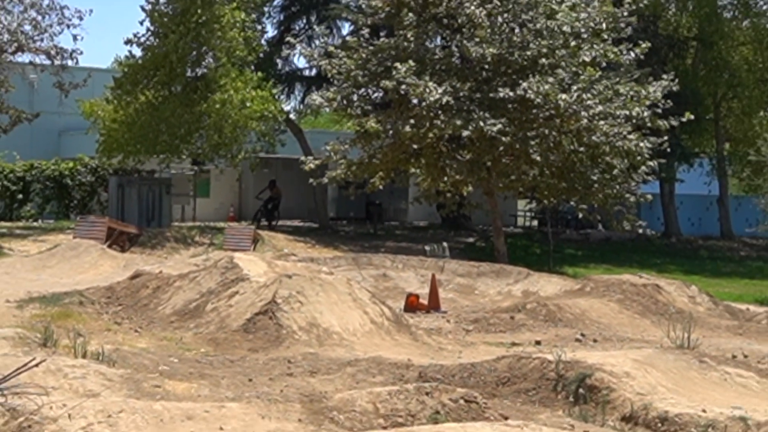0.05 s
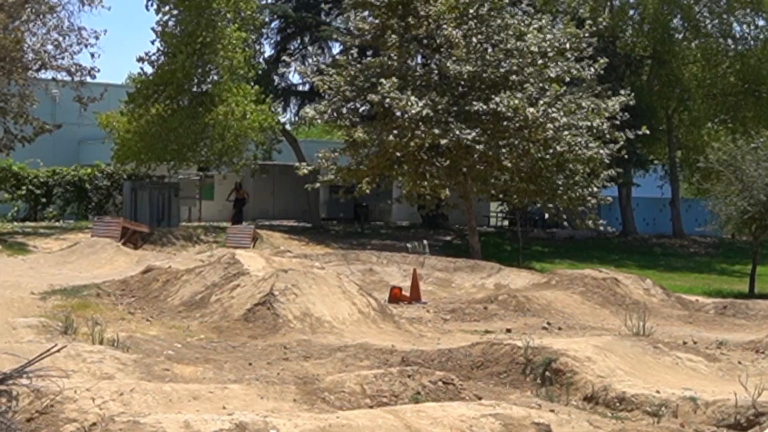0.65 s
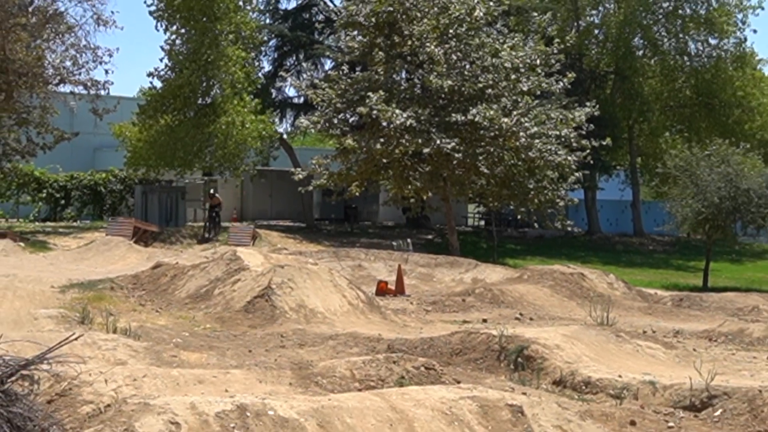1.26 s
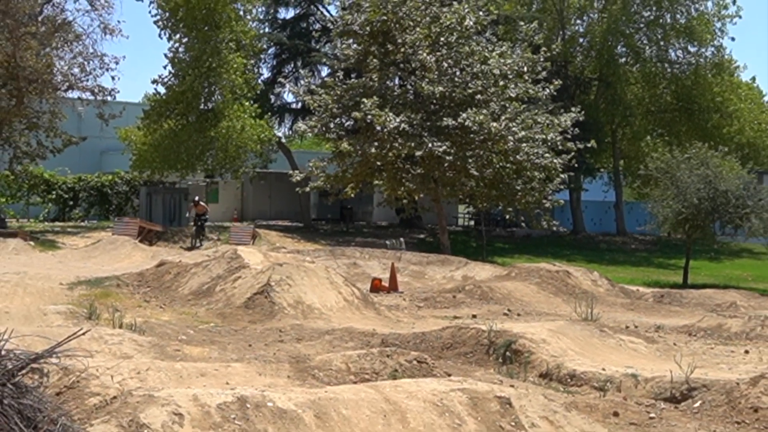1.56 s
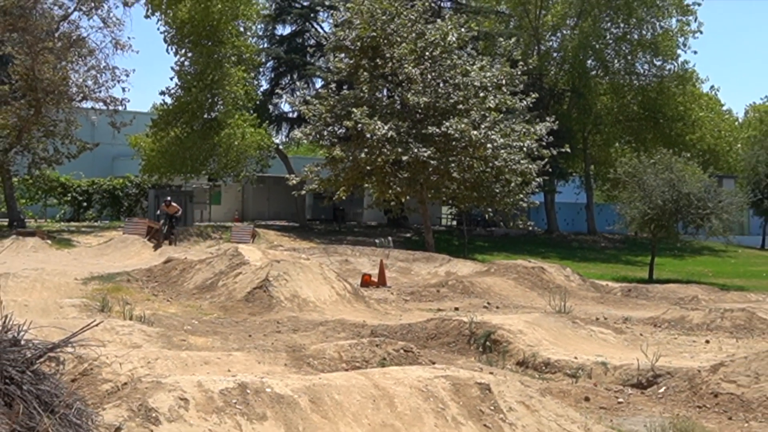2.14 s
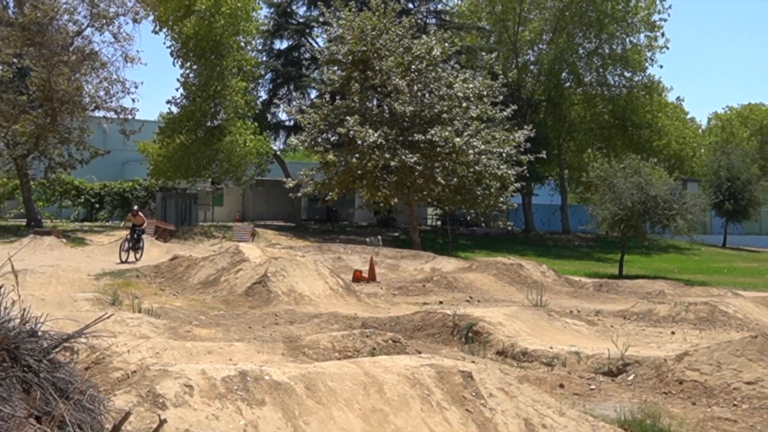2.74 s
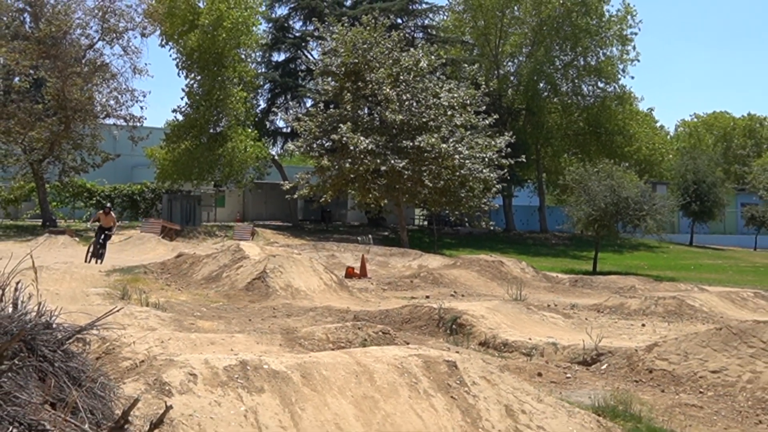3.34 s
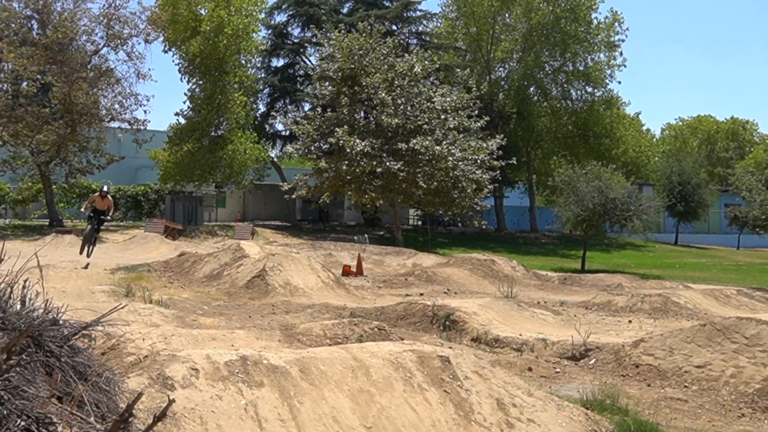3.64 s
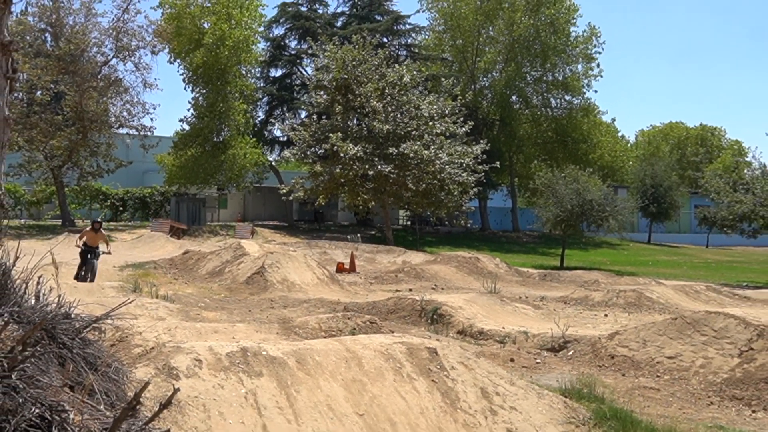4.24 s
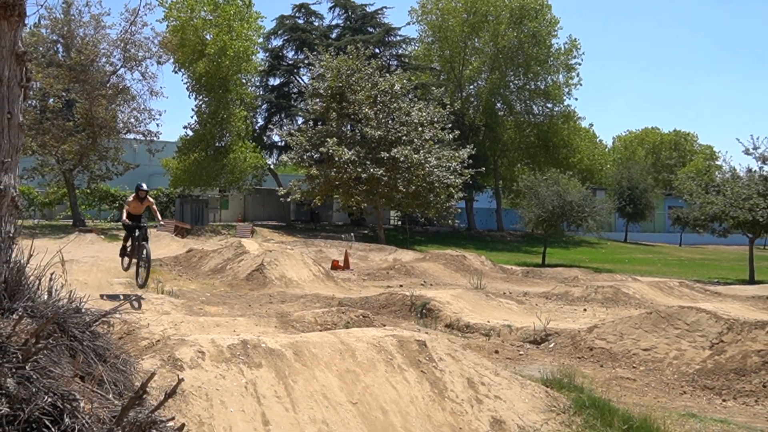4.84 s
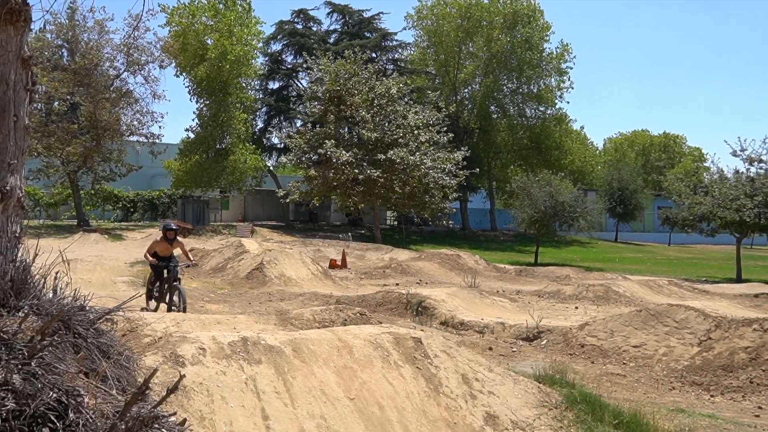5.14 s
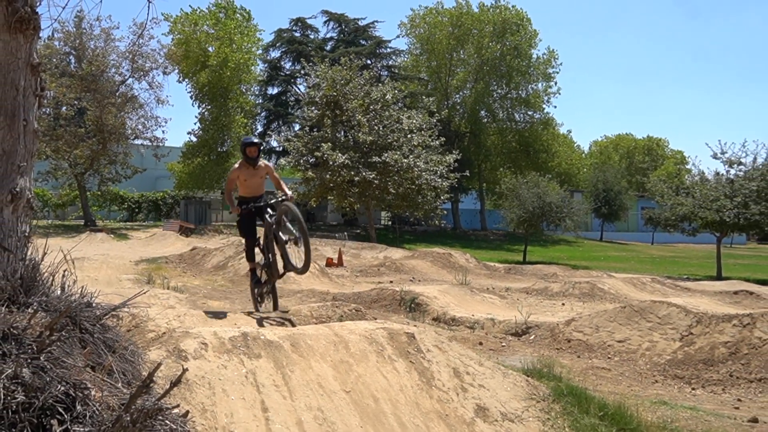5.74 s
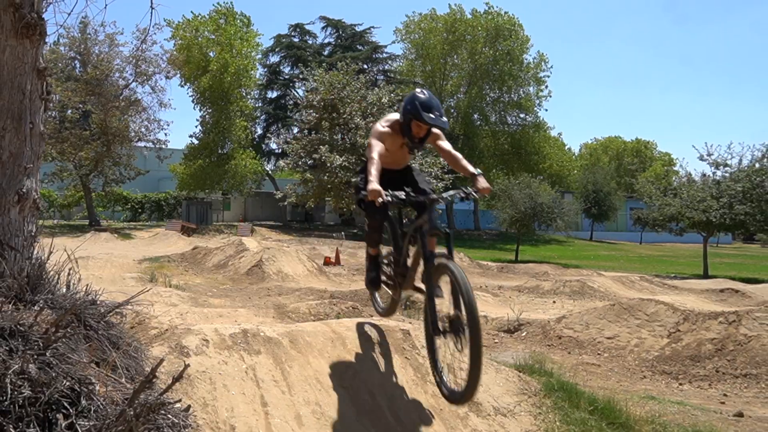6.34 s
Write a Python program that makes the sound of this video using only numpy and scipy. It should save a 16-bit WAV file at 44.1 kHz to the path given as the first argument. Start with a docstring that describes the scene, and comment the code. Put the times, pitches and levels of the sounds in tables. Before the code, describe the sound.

Outdoors at a dirt jump track, low wind buffeting dominates, with soft far traffic and trees behind it. In the second half a bike emerges from the distance with gritty tyre noise, small ticks and a thin freewheel buzz. It thuds over a bump, crunches up a ramp and whirrs through the air, ending with a knock and chain slap near the microphone.

```python
"""Mountain bike jump in gusty wind.

Eddies buffet the microphone's two ports over a wash of distant traffic and trees.
A bike rolls closer: tyres crush dry dirt and pop stones; frame and chain rattle on
bumps and landings. It takes off and flies towards the microphone, its freewheel
buzzing as the pawls snap over the ratchet and ring the hub."""
import sys
import numpy as np
from scipy import signal
from scipy.fft import rfft, irfft, next_fast_len
from scipy.io import wavfile
from scipy.ndimage import uniform_filter1d, map_coordinates

SR = 44100
rng = np.random.default_rng(int(sys.argv[2]) if len(sys.argv) > 2 else 0)


def generate_wav(signal):
    """Clip the signal to [-1, 1] and save it as 16-bit WAV at the path in sys.argv[1]."""
    frames = np.transpose(np.atleast_2d(signal))
    scaled = np.clip(frames, -1, 1) * 32767
    pcm = np.round(scaled).astype(np.int16)
    wavfile.write(sys.argv[1], SR, pcm)


N = 286209
TIME = np.arange(N) / SR


def from_db(db):
    """Decibels to gain."""
    return 10 ** (np.asarray(db) / 20)


def rms_one(x):
    """Scale to unit rms."""
    return x / np.sqrt(np.mean(x ** 2) + 1e-20)


def curve(rows):
    """Breakpoints (t/s, value) interpolated at every sample."""
    return np.interp(TIME, *np.transpose(rows))


def colour(x, spectrum):
    """Filter by breakpoints (f/Hz, level/dB); unit rms."""
    size = next_fast_len(N + 4096)
    hz, db = np.transpose(spectrum)
    bins_hz = np.maximum(np.arange(size // 2 + 1) * SR / size, 1)
    gain = from_db(np.interp(np.log(bins_hz), np.log(hz), db))
    return rms_one(irfft(rfft(x, size) * gain, size)[..., :N])


def drift(rate_hz):
    """Smooth random wander; unit rms."""
    knots, coarse_s = rng.standard_normal(4000), TIME[::16]
    wander = map_coordinates(knots, [coarse_s * rate_hz], order=2, mode="wrap")
    return rms_one(np.interp(TIME, coarse_s, wander))


def stereo_noise(side_db):
    """White noise, partly different in the two channels."""
    mid, side = rng.standard_normal((2, N))
    return mid + from_db(side_db) * side * [[1], [-1]]


def diffuse_noise():
    """Antiphase white noise: sound from all around."""
    return rng.standard_normal(N) * [[1], [-1]]


def delay(x, ms):
    """Variable fractional delay."""
    return map_coordinates(x, [np.arange(N) - ms * SR / 1000], order=3, mode="nearest")


def lag_right(x, ms):
    """The right channel trails the left."""
    return np.array([x[0], delay(x[1], ms)])


def resonate(x, modes):
    """Parallel resonances (f/Hz, width/Hz, rms level/dB)."""
    out = 0
    for hz, width_hz, db in modes:
        radius = np.exp(-np.pi * width_hz / SR)
        feedback = [1, -2 * radius * np.cos(2 * np.pi * hz / SR), radius ** 2]
        out = out + from_db(db) * rms_one(signal.lfilter([1, 0, -1], feedback, x))
    return out


def held(start_s, length_s, rise_s, fall_s):
    """Envelope: rise up to start_s, hold, fall; rise and fall times per 20 dB."""
    before = np.maximum(start_s - TIME, 0) / rise_s
    after = np.maximum(TIME - start_s - length_s, 0) / fall_s
    return from_db(-20 * np.minimum(before + after, 10))


def blows(hits, t60_s, trim_db, late_s=0):
    """Envelope of hits (t/s, level/dB): sudden rise, exponential fall."""
    envelope = 0
    for s, db in hits:
        age_s = TIME - (s + late_s)
        envelope = envelope + (age_s >= 0) * from_db(db + trim_db - 60 * np.clip(age_s / t60_s, 0, 3))
    return envelope


# Breeze between gusts: t/s, level/dB
BREEZE_LEVEL = [(0, -31.5), (0.85, -29.5), (1.6, -29.5), (2.3, -32.5), (2.95, -35), (3.25, -37.5),
                (3.7, -37.5), (4.35, -55), (4.6, -36.5), (5.22, -36.5), (5.38, -31.5), (5.7, -34.5),
                (6.05, -38), (6.49, -35)]
# Gusts: t/s, length/s, level/dB, large-eddy share/dB, small-eddy share/dB
WIND_GUSTS = [(0.021, 0.076, -23, 2.5, -12), (0.122, 0.11, -25.5, -9, -29), (0.616, 0.02, -29, -5, -16.5),
              (0.817, 0.026, -27, -3, -20), (0.892, 0.2, -27, -1, -15), (1.088, 0.033, -19, -1, -6),
              (1.267, 0.16, -26, -.5, -9.5), (1.545, 0.2, -22.5, -3, -9.5), (1.726, .11, -20, -5, -5.5),
              (1.861, 0.33, -22, -4.5, -8.5), (2.251, 0.14, -19.5, -9, -7), (2.48, 0.13, -24.5, -4, -6.5),
              (2.59, 0.029, -20.5, -1.5, -5.5), (2.701, 0.058, -26.5, -19, -16),
              (2.832, 0.054, -30.5, -4, -14), (2.987, 0.023, -27.5, 0.5, -11),
              (3.392, 0.053, -36.5, -11, -4.5), (3.569, 0.085, -27, 0.5, -12.5),
              (3.715, 0.12, -27.5, -1, -15), (3.912, 0.058, -27, 2.5, -20), (3.981, 0.1, -19, -7, -15),
              (4.122, 0.039, -25, 1, -19), (4.254, 0.086, -24, -1, -14), (4.427, 0.053, -23, -5.5, -15),
              (5.337, .27, -28, 0.5, -10), (5.368, 0.042, -25, 1.5, -4.5), (6.196, 0.095, -30, -1.5, -23),
              (6.421, 0.039, -28, -2.5, -15)]


def eddy_gains():
    """Swell, rumble, buffet and flutter gains: breeze carries large eddies, gusts stir all sizes."""
    breeze = from_db(curve(BREEZE_LEVEL))
    large = middle = small = 0
    for s, length_s, db, large_db, small_db in WIND_GUSTS:
        gust = from_db(db) * held(s, length_s, rise_s=0.046, fall_s=0.072)
        slow_gust = from_db(db) * held(s, length_s, rise_s=0.065, fall_s=0.091)
        large = np.maximum(large, slow_gust * from_db(large_db))
        middle = np.maximum(middle, gust)
        small = np.maximum(small, gust * from_db(small_db))
    return (np.hypot(breeze * from_db(-3.5), large * from_db(-7)),
            np.hypot(breeze, large),
            np.hypot(breeze * from_db(-8.5), middle * from_db(-0.1)),
            np.hypot(breeze * from_db(-20.5), small))


def turbulence(source, spectrum, span_s, lumpy_db, lumps_hz):
    """Pressure of eddies of one size: levelled over span_s, then made lumpy."""
    flow = colour(source, spectrum)
    power = uniform_filter1d(np.mean(flow ** 2, axis=0), int(span_s * SR) + 1)
    lumps = from_db(lumpy_db * drift(lumps_hz))
    return colour(flow / np.sqrt(power + 1e-6) * lumps, [(1500, -2.5), (5000, -72)])


# Eddy spectra, largest eddies first: f/Hz, level/dB
SWELL_SPECTRUM = [(2, -40), (15, -4.5), (30, -3.5), (48, -0.5), (62, -11), (120, -49), (1000, -130)]
RUMBLE_SPECTRUM = [(10, -48), (45, -22.5), (60, 1), (80, 3.5), (105, -3), (150, -12), (400, -60),
                   (2000, -130)]
BUFFET_SPECTRUM = [(30, -61), (100, -3.5), (130, 3), (190, -2.5), (250, -7.5), (340, -21.5), (800, -76.5),
                   (3000, -130)]
FLUTTER_SPECTRUM = [(80, -49), (240, -5), (290, 0.5), (400, -6.5), (550, -18.5), (800, -24.5), (1500, -62),
                    (8000, -120)]


def wind():
    """Eddies sweep the left port, then the right; the strongest pushes are rounded off."""
    swell_gain, rumble_gain, buffet_gain, flutter_gain = eddy_gains()
    swell = turbulence(stereo_noise(-15), SWELL_SPECTRUM, span_s=0.37, lumpy_db=0, lumps_hz=3.1)
    rumble = turbulence(stereo_noise(-13), RUMBLE_SPECTRUM, span_s=0.064, lumpy_db=2.5, lumps_hz=30)
    buffet = turbulence(stereo_noise(-8.5), BUFFET_SPECTRUM, span_s=0.05, lumpy_db=2.5, lumps_hz=60)
    # Buffet crests steepen and break into small eddies.
    crests = colour(buffet ** 3, [(150, -23), (300, -2), (600, 7.5), (1500, 20)])
    breakup = 1.16 * colour(stereo_noise(-8.5), [(1200, -5.5), (4000, -58)]) * np.abs(buffet)
    flutter = turbulence(crests + breakup, FLUTTER_SPECTRUM, span_s=0.037, lumpy_db=2, lumps_hz=80)
    calm = wakes()
    slant = 1 + 0.2 * drift(8)  # wind direction wanders
    pressure = (lag_right(swell_gain * swell + rumble_gain * rumble, ms=0.15 * slant)
                + lag_right(calm * buffet_gain * buffet, ms=0.8 * slant)
                + lag_right(calm * flutter_gain * flutter, ms=0.62 * slant)
                + vortices())
    return 0.89 * np.tanh(pressure / 0.74)


def swirl(age_s, hz, lag_ms, phase_cycles, half_length_cycles=0.44, quickening=0.15):
    """A few quickening swings of push and suction, at each port in turn."""
    cycles = (age_s + np.array([[0.5], [-0.5]]) * lag_ms / 1000) * hz
    envelope = np.exp(-(cycles / half_length_cycles) ** 2 / 2)
    return envelope * np.sin(2 * np.pi * (phase_cycles + cycles + quickening * cycles ** 2 / 2))


# Single strong eddies: t/s, relative level/dB, f/Hz, right-port lag/ms
VORTICES = [(0.041, -10, 202, 1.1), (0.047, -14.5, 222, 0.5), (0.081, -17, 163, 1),
            (0.157, -18.5, 185, 1.1), (0.914, -5, 210, 2.25), (1.074, -9.5, 164, 1), (1.1, -7, 222, 1.5),
            (1.117, -7, 244, 1.8), (1.13, -11, 200, -1.5), (1.177, -12.5, 170, 1.1), (1.221, -4, 193, 1.6),
            (1.274, -6.5, 195, 1.5), (1.293, -11, 165, 1.2), (1.323, -10.5, 256, 2.25),
            (1.357, -9.5, 175, 1), (1.393, -8.5, 195, 1.9), (1.559, -13.5, 180, 1.1), (1.62, -5, 210, 1.9),
            (1.688, -8, 175, 1.3), (1.706, -9.5, 168, 1), (1.729, -12, 220, 1.4), (1.773, -12, 230, 0.6),
            (1.798, -6, 200, 1.5), (1.808, -11, 190, 0.7), (1.838, -14, 245, 0.5), (1.963, -7, 222, 1.65),
            (2.005, -13, 242, 1), (2.028, -10, 235, 2.2), (2.043, -9.5, 162, 0.5), (2.055, -11.5, 196, 1.3),
            (2.096, -10, 248, 2.5), (2.115, -12, 253, 0.7), (2.18, -15.5, 256, 0.7), (2.262, -9, 218, 0.7),
            (2.295, -8.5, 218, 0.9), (2.313, -11.5, 173, 0.3), (2.368, -14, 233, 1),
            (2.397, -11.5, 237, 0.4), (2.416, -10, 210, 2), (2.491, -16, 288, -0.3), (2.503, -13, 218, 2),
            (2.587, -13, 230, 2), (2.611, -12, 150, 0.5), (2.631, -9.5, 256, 1.7), (2.644, -8.5, 187, 0.95),
            (2.697, -12, 177, 0.8), (2.826, -14.5, 174, 1.1), (2.846, -17, 247, 1.3),
            (2.878, -13, 235, 0.8), (2.981, -7.5, 205, 1.2), (3.528, -8, 200, 1.6), (3.619, -13, 194, 1.05),
            (3.827, -18, 183, 2), (3.912, -15, 193, 4), (4.017, -10, 189, 1.5), (4.079, -12.5, 197, 3.5),
            (4.24, -13, 197, 1), (4.333, -10, 196, 1), (4.423, -13.5, 164, 1.3), (4.461, -12, 213, 0.64),
            (5.379, -6, 218, 4), (5.392, -5.5, 362, 0.3), (5.412, -7, 149, 1.7), (5.432, -5, 192, 1.2),
            (5.441, -10.5, 290, 0.6), (5.493, -8.5, 224, 2.8), (5.569, -11, 160, 1.5),
            (6.409, -13.5, 112, 1.1)]


def vortices(trim_db=-1.26):
    """Each passing vortex is a swirl with a sharper core that crosses the ports sooner."""
    pressure = np.zeros((2, N))
    for (s, db, hz, lag_ms), phase_cycles in zip(VORTICES, rng.random(len(VORTICES))):
        near = np.abs(TIME - s) < 0.03
        age_s = TIME[near] - s
        body = swirl(age_s, hz, lag_ms, phase_cycles)
        core = swirl(age_s, 2 * hz, 0.55 * lag_ms, 2 * phase_cycles)
        pressure[:, near] += from_db(db + trim_db) * (body + 0.31 * core)
    return signal.sosfilt(signal.butter(6, 760, fs=SR, output="sos"), pressure + 1e-18)


def wakes(late_s=0.00088, half_length_s=0.012, depth=0.46):
    """Gain of the lesser eddies, which each vortex sweeps aside."""
    centres_s = np.sort([s + late_s for s, *_ in VORTICES])
    nearest = np.searchsorted((centres_s[1:] + centres_s[:-1]) / 2, TIME)
    gap_s = np.abs(TIME - centres_s[nearest])
    return 1 - depth * np.exp(-np.minimum(gap_s / half_length_s, 10) ** 2)


# Distant wash: t/s, relative level/dB
WASH_CURVE = [(0, -51.5), (1.08, -50.5), (1.14, -53), (2.4, -56.5), (3.3, -55.5), (4.2, -54.5), (4.6, -55)]
# Spectra of the wash and of its diffuse part: f/Hz, level/dB
WASH_SPECTRUM = [(100, 5.5), (250, -5.5), (500, 4.5), (750, 1), (1050, 0.5), (1400, -2.5), (2000, -5),
                 (3000, -11), (4500, -15.5), (7000, -24), (10000, -29), (16000, -36)]
WASH_SIDE_SPECTRUM = [(900, -6), (2500, 0), (6000, 2)]
# Far whines: f/Hz, width/Hz, level/dB re wash, fade start t/s
FAR_WHINES = [(1127, 18, -13, 7), (4080, 9.1, -23.5, 0.97)]


def wash():
    """Far traffic and leaves, wider in the treble, with two thin whines."""
    spread = rng.standard_normal(N) + from_db(-1.5) * colour(diffuse_noise(), WASH_SIDE_SPECTRUM)
    whines = sum(held(0, until_s, rise_s=1, fall_s=1) * resonate(stereo_noise(side_db=1), [mode])
                 for *mode, until_s in FAR_WHINES)
    gain = from_db(curve(WASH_CURVE) + 9 + 0.68 * drift(24.77))
    return gain * (colour(spread, WASH_SPECTRUM) + whines)


# Traffic swell: f/Hz, level/dB
RUSH_SPECTRUM = [(400, -22), (800, -0.5), (1150, 0), (1500, -10), (2500, -17), (8000, -43)]


def traffic_rush(level_db=-53):
    """A soft rush in the distant traffic swells and passes."""
    envelope = held(start_s=0.78, length_s=0.44, rise_s=1.3, fall_s=0.9)
    return from_db(level_db) * envelope * colour(stereo_noise(side_db=-4), RUSH_SPECTRUM)


# Chain and grit ticks: t/s, relative level/dB
TICK_HITS = [(0.9556, -34.5), (2.1858, -40.5), (3.3403, -41.5), (4.0542, -39), (4.072, -39), (4.091, -37.5),
             (4.1076, -37), (4.228, -38), (4.4767, -42), (5.063, -32), (5.315, -31), (5.458, -25),
             (5.556, -29), (5.628, -32)]


def ticks():
    """Chain and grit give short bright snaps."""
    hiss = colour(stereo_noise(side_db=-1.5), [(1000, -12), (3200, 0.5), (8000, -4.5), (16000, -17)])
    return blows(TICK_HITS, t60_s=0.024, trim_db=-5, late_s=0.0011) * hiss


# Level dips: t/s, depth/dB
GUST_DIPS = [(1.124, 10.5), (1.23, 6.5), (1.64, 4), (1.82, 4), (2.321, 8.5), (2.42, 3.5), (4.34, 4),
             (5.41, 5)]


def dips(onset_s=0.021, recovery_s=0.071):
    """Gain of wash and bike: drops quickly at the hardest gusts and creeps back."""
    loss_db = 0
    for s, db in GUST_DIPS:
        onset = np.clip((TIME - s) / onset_s + 1, 0, 1)
        loss_db = loss_db + db * onset * np.exp(-np.maximum(TIME - s, 0) / recovery_s)
    return from_db(-loss_db)


# Landings and bumps: t/s, relative level/dB
KNOCK_HITS = [(2.53, -42), (4.11, -39), (5.079, -28), (5.126, -36), (6.478, -21.5)]
# Frame chatter: f/Hz, level/dB
FRAME_SPECTRUM = [(150, -18), (300, -46), (500, 25), (750, 5), (1150, 2), (1500, 9), (2100, 14), (3000, 7),
                  (4500, -3), (8000, -10), (16000, -31)]


def frame_knocks():
    """Tyres slap down and the frame and chain chatter briefly."""
    shake = blows(KNOCK_HITS, t60_s=0.14, trim_db=-5.5) * from_db(2.75 * drift(250))
    return shake * colour(stereo_noise(side_db=-32), FRAME_SPECTRUM)


def distance_m(speed_m_per_s=6.05, pass_s=6.65, miss_m=1.92):
    """Range of the bike, riding steadily along a line past the microphone."""
    return np.hypot(speed_m_per_s * (pass_s - TIME), miss_m)


def nearness(ground_loss_db_per_m=0.13):
    """Gain from spreading and from loss over the ground."""
    return from_db(-ground_loss_db_per_m * distance_m()) / distance_m()


# Tyre load on landings, turns and ramps: t/s, length/s, relative level/dB
TYRE_PRESSES = [(2.55, 0.043, -24), (3.2, 0.26, -27), (4.07, 0.32, -26.5), (4.55, 0.61, -33),
                (5.105, 0.047, -24), (5.227, 0.37, -26), (5.535, 0.13, -25.5)]
# Dirt crunch: f/Hz, level/dB
CRUNCH_SPECTRUM = [(120, -7), (300, 6.5), (420, 1.5), (560, 6.5), (680, 6), (850, -1.5), (1150, -0.5),
                   (1500, -2.5), (2200, -2.5), (3000, -8.5), (4500, -16.5), (8000, -27), (16000, -24.5)]


def tyres(grains_per_s=6000):
    """Knobs crush dry dirt in dense, uneven grains, louder under load."""
    load = from_db(-37.5)  # running light
    for s, length_s, db in TYRE_PRESSES:
        load = np.maximum(load, from_db(db) * held(s, length_s, rise_s=0.057, fall_s=0.21))
    onsets = rng.random(N) < grains_per_s / SR
    sizes = from_db(3.3 * np.minimum(rng.exponential(1, N), 4))
    gain = load * nearness() * from_db(4.5 + 0.74 * drift(110))
    return gain * colour(onsets * sizes * stereo_noise(side_db=-15), CRUNCH_SPECTRUM)


# Coasting spells, the last in flight: t/s, length/s, rise/s, relative level/dB
COAST_SPELLS = [(3.556, 0.75, 1.3, -28.5), (4.417, 1.52, 0.26, -27.5), (5.785, 0.88, 0.24, -26.5)]


def hub_gain():
    """The freewheel sounds while coasting; a landing jolts it, the take-off ramp hides it."""
    coasting = 0
    for s, length_s, rise_s, db in COAST_SPELLS:
        coasting = np.maximum(coasting, from_db(db) * held(s, length_s, rise_s, fall_s=0.12))
    jolt_db = 4.2 * held(start_s=5.1, length_s=0.071, rise_s=0.069, fall_s=0.073)
    shadow_db = -3.8 * held(start_s=5.4, length_s=0.27, rise_s=0.057, fall_s=0.045)
    return coasting * nearness() * from_db(jolt_db + shadow_db)


# Hub, rotor and spoke modes: f/Hz, width/Hz, far level/dB, near level/dB
WHEEL_MODES = [(1117, 23, -16, -19.5), (1880, 120, -25.5, -23), (2120, 63, -13.5, -20),
               (2450, 150, -22.5, -16.5), (4650, 200, -22, -16), (4940, 160, -25, -20.5),
               (5860, 260, -22, -18), (6800, 80, -31, -26), (7530, 520, -16, -20.5),
               (9280, 140, -22, -20.5), (11350, 380, -15.5, -23.5)]


def hub_ringing(drive, closeness, waver_db=1.7, waver_hz=11):
    """Each mode wavers on its own and moves from its far to its near level."""
    ring = 0
    for hz, width_hz, far_db, near_db in WHEEL_MODES:
        level_db = far_db + closeness * (near_db - far_db) + waver_db * drift(waver_hz)
        ring = ring + from_db(level_db) * resonate(drive, [(hz, width_hz, 0)])
    return ring


# Pawl click rate: t/s, f/Hz
PAWL_RATE = [(2.6, 200), (4.4, 310), (4.9, 296), (5.86, 233), (6.0, 233), (6.13, 305), (6.3, 225),
             (6.49, 210)]
# Freewheel buzz: f/Hz, level/dB
HUB_SPECTRUM = [(500, -23), (1200, -14), (1700, 3), (2150, 2), (2550, -1), (3100, -1), (4000, -1),
                (4800, -3), (5400, -1), (7500, -0.5), (10000, -0.5), (13000, 0.5), (15700, 3.5)]


def freewheel(rattle_decay_s=0.002):
    """Pawls snap over the ratchet teeth; each snap rings the wheel and stirs a fine rattle."""
    rate_hz = curve(PAWL_RATE)
    teeth = np.cumsum(rate_hz * (1 + 0.028 * drift(140))) / SR
    snaps = np.diff(np.floor(teeth), prepend=0) * from_db(2.5 * rng.standard_normal(N))
    snaps = colour(snaps, [(1000, -3), (2400, 0), (4000, -7), (7000, -14), (16000, -20)])
    snap_age_s = (teeth % 1) / rate_hz
    rattle = rms_one(2.6 + np.exp(-snap_age_s / rattle_decay_s)) * stereo_noise(side_db=-25)
    drive = rattle + 0.52 * snaps
    closeness = np.interp(TIME, [5.45, 5.8], [0, 1])
    near = colour(drive, HUB_SPECTRUM) + hub_ringing(drive + 0.31 * stereo_noise(side_db=5), closeness)
    # From afar: a thinner sizzle, its top absorbed by the air.
    scattered = near + from_db(-1.5) * diffuse_noise()
    far = colour(scattered, [(2200, 0), (5000, 0.5), (12500, -3.5), (16000, -11.5)])
    gain = hub_gain() * from_db(drift(35))
    return gain * (far + closeness * (near - far + wheel_whirr()))


# Freewheel treble: t/s, level/dB
TREBLE_LEVEL = [(4.3, -2.5), (4.6, 1.5), (4.9, -2.5), (5.13, 2.5), (5.4, -2), (5.66, .5), (5.79, 1.5),
                (5.88, -1), (5.96, 0.5), (6.07, -2), (6.26, -3.5), (6.38, -1), (6.46, 1.5)]


def shade_treble(x, split_hz=5500):
    """The treble swells and fades as the bike comes on."""
    low = signal.sosfiltfilt(signal.butter(2, split_hz, fs=SR, output="sos"), x)
    return low + from_db(curve(TREBLE_LEVEL)) * (x - low)


# Stones under the tyres: t/s, relative level/dB
STONE_HITS = [(4.051, -34), (4.085, -39), (4.115, -38), (5.237, -41), (5.263, -31), (5.35, -33),
              (5.429, -28), (5.529, -33), (5.557, -30), (5.584, -31), (5.629, -30), (5.668, -38),
              (5.696, -40)]
# Stone crack: f/Hz, level/dB
STONE_SPECTRUM = [(400, -20), (1000, 2), (1500, 1), (2300, 3), (3200, -9), (5000, -28), (12000, -34)]


def stones(cracks_per_s=9000):
    """Each stone gives way in a short run of sharp cracks."""
    cracks = (rng.random(N) < cracks_per_s / SR) * stereo_noise(side_db=-14)
    return blows(STONE_HITS, t60_s=0.067, trim_db=-9.5) * colour(cracks, STONE_SPECTRUM)


# Chain slaps: t/s, relative level/dB
CHAIN_HITS = [(4.078, -41), (4.428, -40.5), (4.592, -41.5), (5.081, -36), (5.114, -32.5), (5.26, -44),
              (5.63, -35.5), (6.439, -35.5), (6.477, -26)]
# Chain-on-frame modes: f/Hz, width/Hz, relative level/dB
CHAIN_MODES = [(1166, 58, -5), (2160, 190, -5), (2500, 240, -2), (3250, 1300, -11), (4670, 380, -20),
               (7240, 700, -13)]


def chain_clanks():
    """The chain slaps the frame with a short metallic chatter."""
    ring = resonate(stereo_noise(side_db=-15), CHAIN_MODES)
    metal = colour(ring, [(500, -12), (1500, 3), (8000, -0.5), (16000, -13)])
    return blows(CHAIN_HITS, t60_s=0.11, trim_db=-3) * from_db(2.2 * drift(200)) * metal


# Tyre landings: t/s, relative level/dB
THUD_HITS = [(5.081, -29.5), (5.113, -37)]
# Tyre casing modes: f/Hz, width/Hz, level/dB
TYRE_MODES = [(440, 70, -1), (520, 69, 1), (710, 130, -8)]


def tyre_thuds():
    """The air-filled tyres boom as they hit the dirt."""
    return blows(THUD_HITS, t60_s=0.19, trim_db=-8) * resonate(stereo_noise(side_db=-25), TYRE_MODES)


TAKE_OFF_S = 5.84
# Wheel whirr: t/s, f/Hz
WHEEL_PITCH = [(5.75, 2130), (6.33, 2112), (6.43, 2080), (6.49, 2020)]


def wheel_whirr(width_hz=40, swell_db_per_s=7):
    """The spinning wheel's narrow, wavering ring grows in flight and sinks as it draws level."""
    phase = 2 * np.pi * np.cumsum(curve(WHEEL_PITCH)) / SR
    ring = rms_one(drift(width_hz) * np.cos(phase) + drift(width_hz) * np.sin(phase))
    return from_db(-14.5 + swell_db_per_s * (TIME - TAKE_OFF_S)) * ring


def over_ground(x, mic_height_m=1.205, hub_height_m=1.3, sound_m_per_s=343, clear_ramp_s=0.17):
    """In flight a dull bounce off the dirt joins in; its comb slides down as the bike nears."""
    detour_m = np.hypot(distance_m(), mic_height_m + hub_height_m) - distance_m()
    dull = signal.sosfilt(signal.butter(2, 3500, fs=SR, output="sos"), x)
    bounce = np.array([delay(side, 1000 * detour_m / sound_m_per_s) for side in dull])
    airborne = np.clip((TIME - TAKE_OFF_S) / clear_ramp_s, 0, 1)
    return x + 0.5 * airborne * bounce


def scene():
    """The bike comes in slightly from the left, between wash and wind."""
    bike = tyres() + stones() + tyre_thuds() + frame_knocks() + chain_clanks() + ticks()
    bike += over_ground(shade_treble(freewheel()))
    lag_ms = np.interp(TIME, [5.15, 5.75], [0.03, 0])  # swings round to straight ahead
    bike = lag_right(bike, lag_ms) * from_db([[0.8], [0.1]])
    return wind() + dips() * (wash() + traffic_rush() + bike)


def record(dry):
    """Steep low-pass at 15.8 kHz."""
    return signal.sosfilt(signal.ellip(12, 0.1, 90, 15800, fs=SR, output="sos"), dry)


dry = scene()
out = record(dry)
generate_wav(out)
```